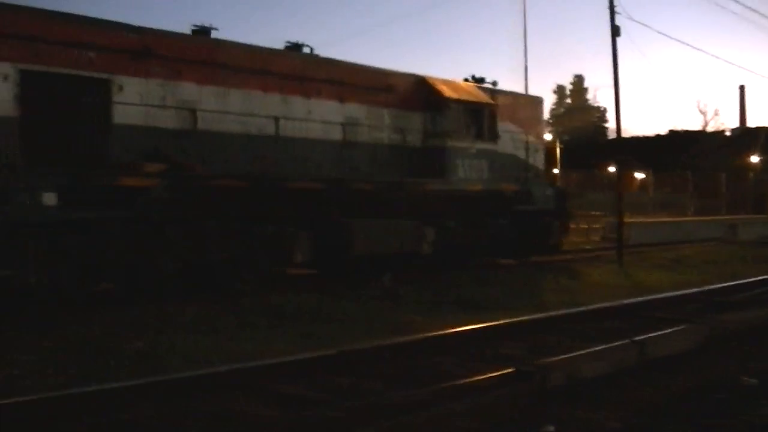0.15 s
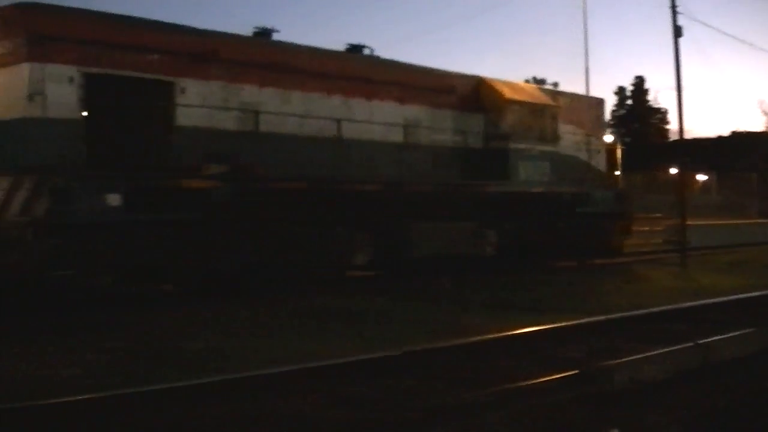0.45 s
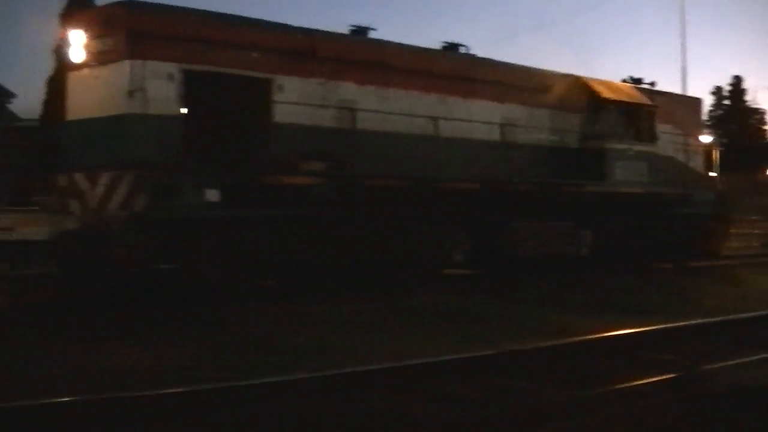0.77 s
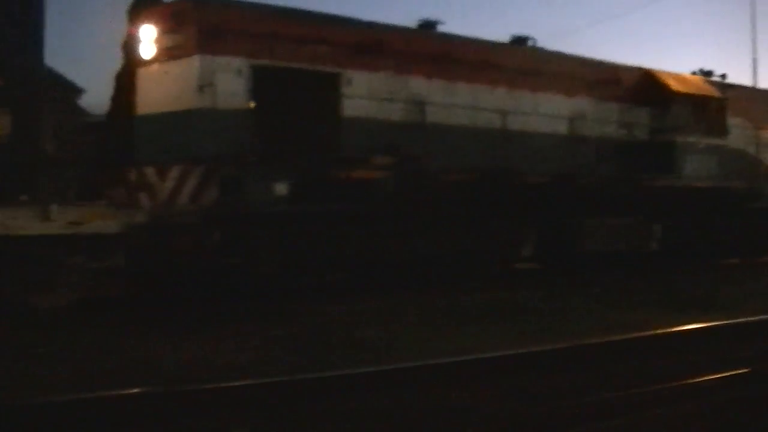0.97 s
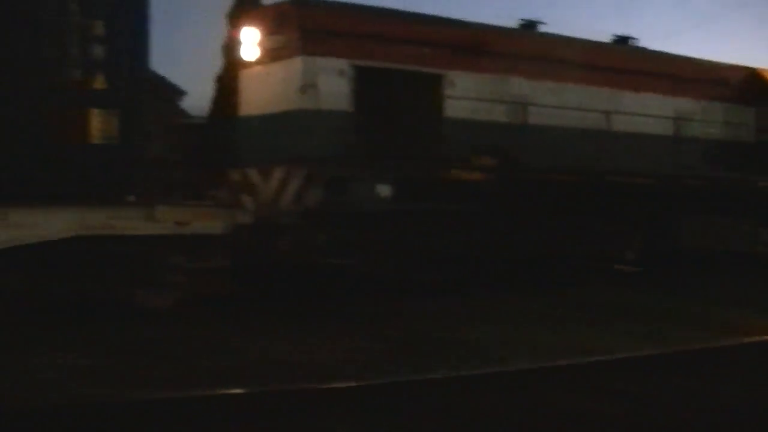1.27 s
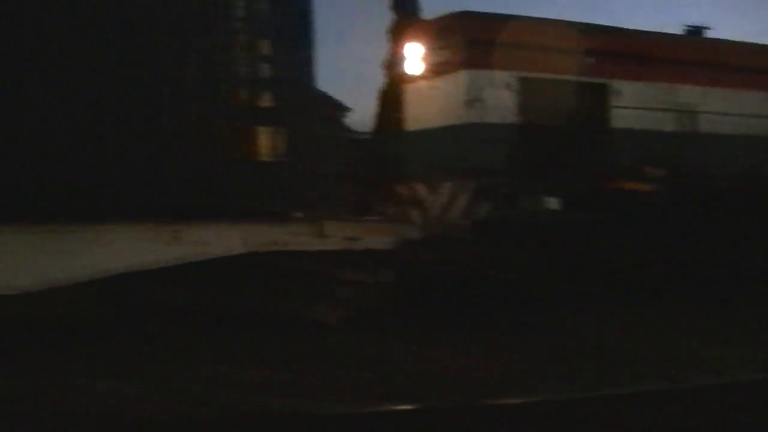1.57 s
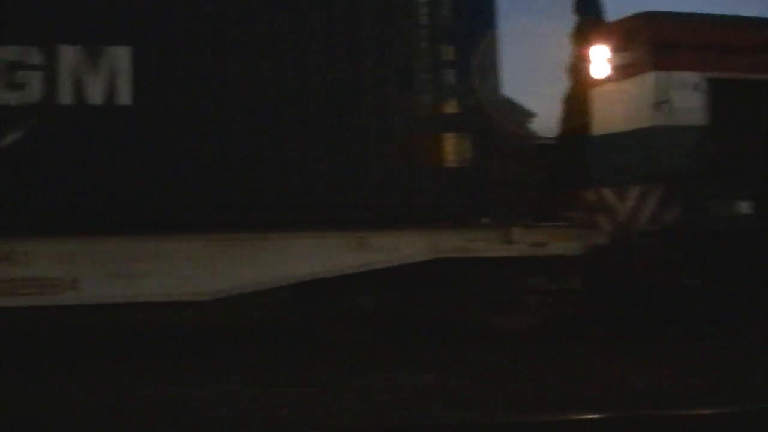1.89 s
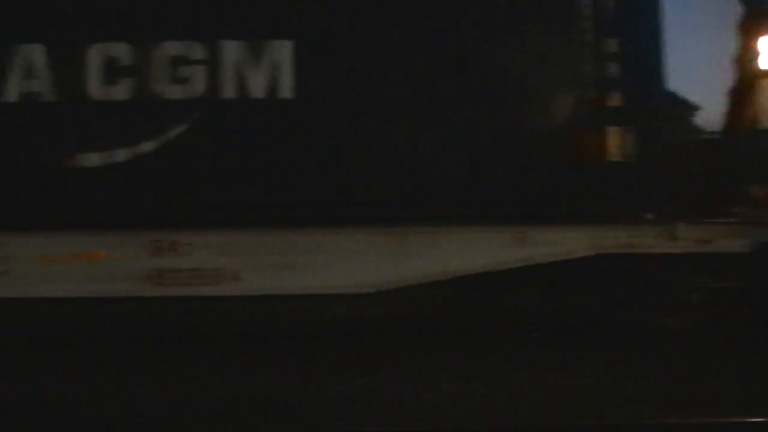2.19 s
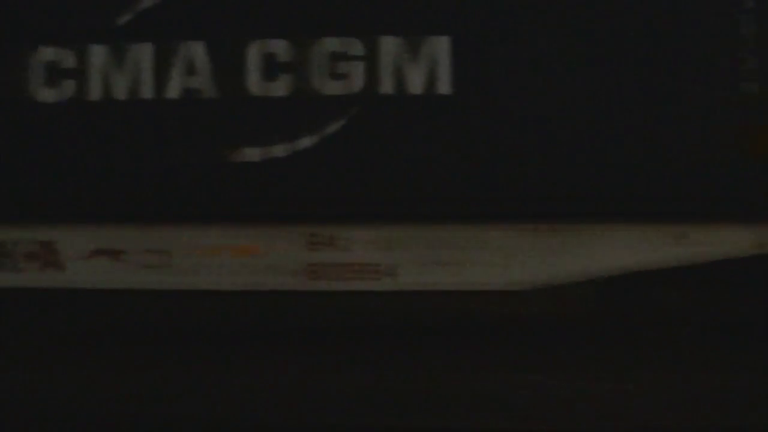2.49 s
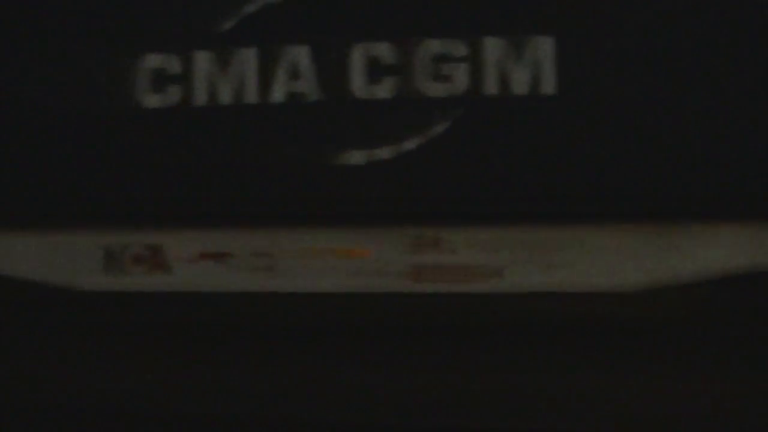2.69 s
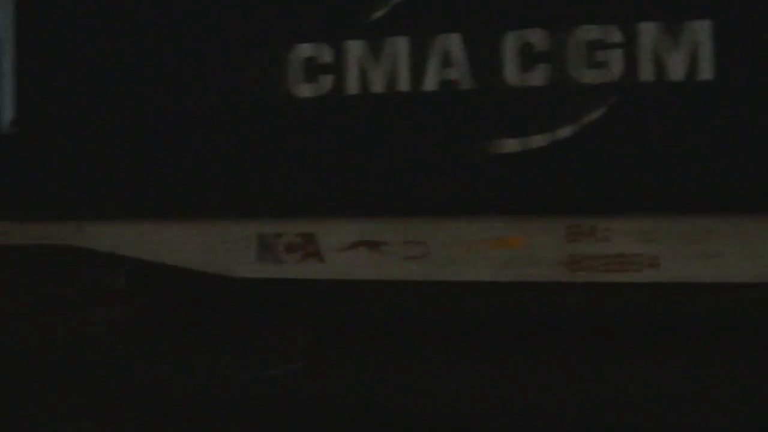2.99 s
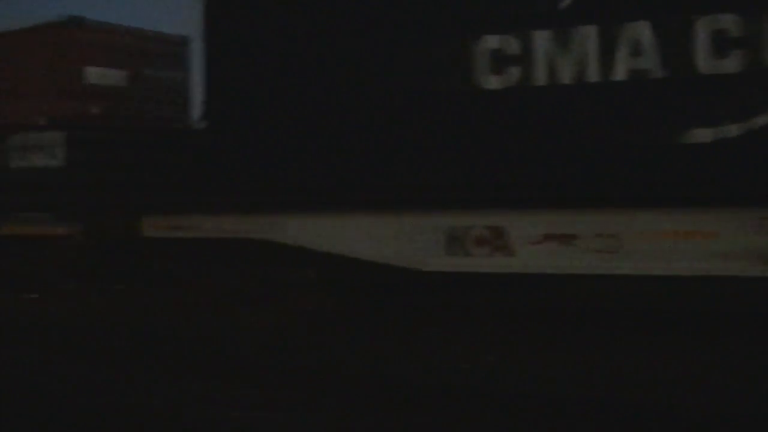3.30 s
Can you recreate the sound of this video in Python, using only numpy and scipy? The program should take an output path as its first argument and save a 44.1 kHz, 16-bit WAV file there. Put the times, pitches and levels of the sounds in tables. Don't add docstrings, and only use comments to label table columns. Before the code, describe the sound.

A diesel locomotive rolls past close by outdoors, its steady uneven chug and gear whine inside a broad roar, with steel clanks and dull thuds; a small microphone thins the bass.

```python
import sys
import numpy as np
from scipy import signal
from scipy.io import wavfile

SR = 44100
rng = np.random.default_rng(int(sys.argv[2]) if len(sys.argv) > 2 else 0)


def voltage_ratio(level):
    return 10 ** (np.asarray(level, float) / 20)


def generate_wav(sig):
    pcm = np.round(np.clip(np.atleast_2d(sig).T, -1, 1) * 32767).astype(np.int16)
    wavfile.write(sys.argv[1], SR, pcm)


N = 152145
CRANK_HZ, CRANK_ZERO_S = 13.35, 0.033
PUMP_HZ, PUMP_ZERO_S = 8.9, 0.079

CYLINDER_DB = [5.5, -4, 5, 2.5, -3, -3]


def rms_one(x):
    return x / np.sqrt(np.mean(x ** 2) + 1e-20)


def in_time(rows):
    s, db = np.transpose(rows)
    return np.interp(np.arange(N) / SR, s, db)


def drift(rate_hz):
    thinning = 40
    r = np.exp(-2 * thinning * np.pi * rate_hz / SR)
    white = rng.standard_normal(N // thinning + 2002)
    slow = signal.lfilter([1], [1, -2 * r, r * r], white)[2000:]
    return np.interp(np.arange(N) / thinning, np.arange(len(slow)), rms_one(slow - slow.mean()))


def resonate(x, hz, width_hz):
    r = np.exp(-np.pi * width_hz / SR)
    zeros = np.array([1, 0, -1]) * (1 - r * r) / 2
    poles = [1, -2 * r * np.cos(2 * np.pi * hz / SR), r * r]
    return signal.lfilter(zeros, poles, x)


def band(x, low_hz, high_hz):
    sos = signal.butter(2, [low_hz, min(high_hz, 0.45 * SR)], "band", fs=SR, output="sos")
    return signal.sosfilt(sos, x)


def banded_noise(spectrum, shared_db, own_db, count=3):
    hz_at, db_at = np.transpose(spectrum)
    octaves = np.arange(0, np.log2(hz_at[-1] / hz_at[0]) + 1 / count, 1 / count)
    edges = hz_at[0] * 2 ** octaves
    white = rng.standard_normal((2, N + 4000))
    together = drift(9.2)
    out = 0
    for k, (low, high) in enumerate(zip(edges, edges[1:])):
        db = np.interp(np.log(low * high) / 2, np.log(hz_at), db_at)
        gain = voltage_ratio(db + shared_db * together + own_db * drift(6.2))
        out = out + gain * band(white[k % 2], low, high)[4000:]
    return rms_one(out)


def heard_time():
    pitch_fall_per_s = -0.00035
    t = np.arange(N) / SR
    return t + pitch_fall_per_s * (t - t[-1] / 2) ** 2 / 2


def abeam(time, centre_s, spread_s):
    return np.exp(-((time - centre_s) / spread_s) ** 2)


def pump_throb(time):
    return np.cos(2 * np.pi * PUMP_HZ * (time - PUMP_ZERO_S))


def sine(hz, time):
    return np.sqrt(2) * np.sin(2 * np.pi * (hz * time + rng.random()))


def struck(age, db, rise_s, t60_s):
    return voltage_ratio(db - 60 * age / t60_s) * (1 - np.exp(-age / rise_s))


def hiss():
    # (frequency [Hz], density [dB per Hz])
    hiss_colour = [(5000, -6), (7500, -8), (9500, -1), (11000, -4), (13500, -9), (16000, -17)]
    t = np.arange(N) / SR
    trend_db = -1 * (t - t[-1] / 2)
    level_db = -57 + 2.5 * abeam(t, 2.0, 0.5) + trend_db
    return voltage_ratio(level_db) * banded_noise(hiss_colour, shared_db=0.1, own_db=0.2, count=7)


def ground(x):
    # (frequency [Hz], width [Hz], share removed [1])
    ground_dips = [(390, 23, 0.32), (1600, 87, 0.28), (2270, 100, 0.17), (2960, 83, 0.19)]
    for hz, width_hz, share in ground_dips:
        x = x - share * resonate(x, hz, width_hz)
    return x


def yard(x):
    # (delay [s], level [dB])
    echo_paths = [
        (.023, -18),
        (.061, -7.5),
        (.118, -26),
    ]
    dull = band(x, 60, 4600)
    return x + sum(voltage_ratio(db) * np.roll(dull, int(s * SR)) for s, db in echo_paths)


def rolling_level(time):
    # (time [s], level [dB])
    roll_levels = [(0.08, -22), (0.11, -24), (0.23, -22), (0.4, -22.5), (0.68, -23.5), (1.76, -23),
                   (1.95, -24), (3.05, -25), (3.45, -27)]
    return in_time(roll_levels) + 0.77 * pump_throb(time)


def roar(roll_db, turns):
    # (frequency [Hz], density [dB per Hz])
    roar_colour = [(30, -20.5), (110, -9.5), (220, -15), (330, -4.5), (780, -3.5), (860, -6.5),
                   (1800, -11.5), (6500, -29.5)]
    level_db = roll_db - 2 + 0.15 * np.cos(2 * np.pi * turns)
    return voltage_ratio(level_db) * banded_noise(roar_colour, shared_db=0.26, own_db=1.24)


def thuds():
    # (time [s], mode frequency [Hz], level [dB])
    frame_blows = [(.17, 480, -29), (.5, 720, -30), (.61, 520, -28), (.715, 700, -30), (1.08, 345, -29),
                   (1.62, 715, -26), (1.76, 350, -30), (1.885, 330, -27), (1.97, 770, -30),
                   (2.325, 740, -26), (2.53, 715, -30), (2.75, 730, -30), (2.8, 340, -30), (2.96, 345, -28),
                   (3.02, 335, -29), (3.25, 320, -30), (3.4, 345, -28)]
    width_hz, rattle_db = 94, -4
    t, white, out = np.arange(N) / SR, rng.standard_normal(N), 0
    for s, hz, db in frame_blows:
        age = np.maximum(t - s, 0)
        mode = np.sin(2 * np.pi * hz * age)
        rattle = rms_one(resonate(resonate(white, hz, width_hz), hz, 2 * width_hz))
        out = out + struck(age, db, rise_s=0.007, t60_s=0.38) * (mode + voltage_ratio(rattle_db) * rattle)
    return out


def clanks():
    # (time [s], peak level [dB])
    clank_blows = [(0.2494, -30), (0.3194, -16), (0.4014, -17), (0.4694, -27), (0.545, -20),
                   (0.6394, -15.5), (0.7744, -20), (0.8506, -17), (0.9274, -21), (0.9624, -26),
                   (1.0053, -25), (1.0794, -16), (1.1889, -16), (1.2894, -19), (1.3894, -25), (1.4524, -12),
                   (1.529, -13.5), (1.5703, -30), (1.6337, -13.5), (1.69, -22), (1.7596, -21),
                   (1.8994, -20), (1.9854, -15), (2.1294, -17), (2.206, -27), (2.3494, -17), (2.4274, -28),
                   (2.5815, -21), (2.6441, -21), (2.7169, -26), (2.8155, -24), (2.9794, -21), (3.1081, -28),
                   (3.1823, -27), (3.2472, -21), (3.304, -26), (3.4194, -18.5)]
    # (time [s], frequency [Hz], level [dB], decay by 60 dB [s])
    steel_rings = [
        (1.452, 9130, -37, .06),
        (1.455, 6500, -45, .05),
        (1.571, 3300, -32, .03),
    ]
    t, level, rings = np.arange(N) / SR, np.zeros(N), np.zeros(N)
    for s, db in clank_blows:
        age = np.maximum(t - s, 0)
        level += struck(age, db - 16, rise_s=0.0018, t60_s=0.18)
    for s, hz, db, t60_s in steel_rings:
        age = np.maximum(t - s, 0)
        rings += voltage_ratio(db - 60 * age / t60_s) * np.sin(2 * np.pi * hz * age)
    steel = signal.lfilter([1], [1, -0.75], rng.standard_normal(N))
    steel = band(band(steel, 900, 8350), 300, 10000)
    return rings + level * rms_one(steel)


def panels(time):
    # (frequency [Hz], width [Hz], level [dB], loudest time [s], spread [s])
    panel_modes = [(433, 9, -43, 1.6, 2), (540, 20, -42.5, .6, 1.5), (648, 10, -44, 2.2, 1),
                   (735, 10, -42, 1.6, 1.2), (781, 20, -41, 2.1, 1.2), (980, 14, -47, .6, 1.2),
                   (1815, 12, -51, .8, 1)]
    throb_db = 4 * pump_throb(time)
    out = 0
    for hz, width_hz, db, s, spread_s in panel_modes:
        white = rng.standard_normal(N)
        song = rms_one(resonate(resonate(white, hz, 2 * width_hz), hz, width_hz))
        out = out + voltage_ratio(db + throb_db) * abeam(time, s, np.sqrt(2) * spread_s) * song
    return out


def hums(time):
    # (frequency [Hz], level [dB], trend [dB/s])
    hum_tones = [(80, -62, 0.5), (104.7, -57, 2), (129, -55, .5), (244, -50, .5), (293, -47, -.8),
                 (333, -45, 2), (1203, -51, 0.3), (1455.5, -47, 0), (1469, -48, -.5), (2471, -52.5, -1)]
    t = time - time[-1] / 2
    return sum(voltage_ratio(db + trend * t + 0.5 * drift(2.2)) * sine(hz, time) for hz, db, trend in hum_tones)


def clatter(turns):
    # (time [s], level [dB])
    hood_levels = [(0.08, -36), (0.12, -34.5), (0.23, -39), (0.45, -37), (1.53, -37), (2.34, -43),
                   (3.18, -44.5), (3.45, -57)]
    # (frequency [Hz], density [dB per Hz])
    clatter_colour = [(1000, 5), (1500, -9.5), (2000, 2), (3450, -18), (4000, -16), (7000, -20),
                      (9900, -19.5), (15800, -61)]
    turn_db = 0.5 * np.cos(2 * np.pi * turns)
    fire_db = 0.9 * np.cos(2 * np.pi * len(CYLINDER_DB) * turns)
    level_db = in_time(hood_levels) + 1.5 + turn_db + fire_db
    return voltage_ratio(level_db) * banded_noise(clatter_colour, shared_db=0.5, own_db=1.4, count=5)


def fan_gear(time):
    # (multiple of mesh rate [1], level [dB])
    fan_harmonics = [(4, -44.5), (6, -52.5), (7, -54), (8, -59), (9, -66), (11, -67), (13, -69)]
    mesh_hz, wobble_db = 461.9, 2
    swell_db = 3.5 * abeam(time, 1.65, 0.25)
    out = 0
    for k, db in fan_harmonics:
        out = out + voltage_ratio(db + swell_db + wobble_db * drift(2.8)) * sine(k * mesh_hz, time)
    return out


def blower(time, turns):
    # (multiple of mesh rate [1], level [dB], trend [dB/s], sideband [dB], swell abeam [dB])
    blower_harmonics = [(1, -36.3, 1.2, -5, -1), (2, -39, -2, -9, 1.5), (3, -39, 1.2, -5, -1),
                        (4, -42.5, -1, -3, 4.5), (5, -49.5, 1.5, -6, -.5), (6, -52, -1, -6, .5)]
    mesh_hz, wobble_db, haze_db = 350.9, 0.7, -14
    t = time - time[-1] / 2
    swell = abeam(time, 1.6, 0.41)
    out = 0
    for k, db, trend, side_db, swell_db in blower_harmonics:
        phase = 2 * np.pi * (k * mesh_hz * time + rng.random())
        side_phase = phase + 2 * np.pi * (turns + rng.random())
        sideband = voltage_ratio(side_db + wobble_db * drift(1.6)) * np.sin(side_phase)
        tone = np.sin(phase) + sideband
        haze = voltage_ratio(haze_db) * rms_one(resonate(rng.standard_normal(N), k * mesh_hz, 20))
        level_db = db + trend * t + swell_db * swell + wobble_db * drift(1.6)
        out = out + voltage_ratio(level_db) * (np.sqrt(2) * tone + haze)
    return out


def exhaust(turns):
    # (frequency [Hz], width [Hz], level [dB], trend [dB/s])
    pipe_modes = [(103, 56, -11.5, 0.5), (188, 72, -5.5, 1), (256.6, 47, -1, 2.5), (295.6, 13, -4.5, 1.7),
                  (336, 47, -8.5, 2.5), (444, 88, -7.5, -4), (538, 58, 2.5, -2.6), (664, 75, -2.5, 2.7),
                  (759, 61, -1, 4), (1396, 91, -0.5, -3.2), (1936, 240, 0.5, 1), (3270, 310, -5.5, 1.5)]
    slip_s, jitter_db, air_db = 0.001114, 3.5, -2
    firing = np.floor(turns * len(CYLINDER_DB)).astype(int)
    at = np.flatnonzero(np.diff(firing)) + 1
    size, slip = rng.standard_normal((2, len(at)))
    puff_at = np.clip(at + (slip_s * SR * slip).astype(int), 0, N - 1)
    puffs = np.zeros(N)
    puffs[puff_at] = voltage_ratio(np.take(CYLINDER_DB, firing[at], mode="wrap") + jitter_db * size)
    gas = rms_one(puffs) + voltage_ratio(air_db) * rng.standard_normal(N)
    t = (np.arange(N) - N / 2) / SR
    out = 0
    for k, (hz, width_hz, db, trend) in enumerate(pipe_modes):
        mode = resonate(resonate(gas, hz, width_hz), hz, 2 * width_hz) / np.sqrt(width_hz)
        out = out + voltage_ratio(db + trend * t) * (-1) ** k * mode
    return voltage_ratio(-33) * rms_one(out)


def scene():
    time = heard_time()
    turns = CRANK_HZ * (time - CRANK_ZERO_S)
    roll_db = rolling_level(time)
    engine = voltage_ratio(roll_db - roll_db.mean()) * exhaust(turns)
    over_ground = ground(yard(engine + clanks()) + roar(roll_db, turns) + clatter(turns))
    tones = blower(time, turns) + fan_gear(time) + hums(time)
    return (over_ground + tones + panels(time) + thuds())[None]


def top_cut(x):
    return signal.sosfilt(signal.butter(12, 15790, fs=SR, output="sos"), x)


def record(dry):
    x = dry + hiss()
    for cut_hz in (114, 55):
        x = signal.sosfilt(signal.butter(2, cut_hz, "high", fs=SR, output="sos"), x)
    start_s, fade_s = 0.0426, 0.0059
    progress = np.clip((np.arange(N) / SR - start_s) / fade_s, 0, 1)
    fade = np.sin(np.pi / 2 * progress) ** 2
    return top_cut(x * fade)


dry = scene()
out = record(dry)
generate_wav(out)
```